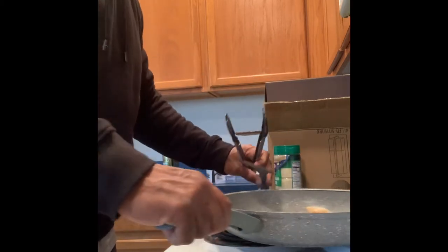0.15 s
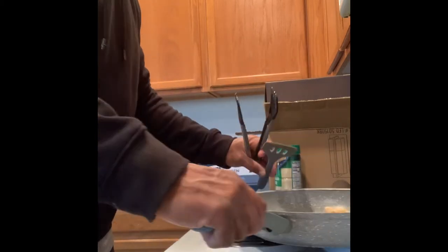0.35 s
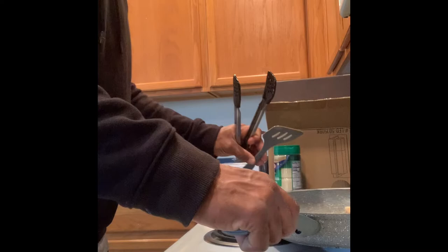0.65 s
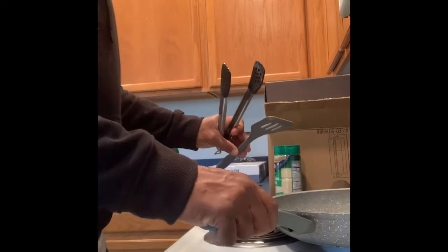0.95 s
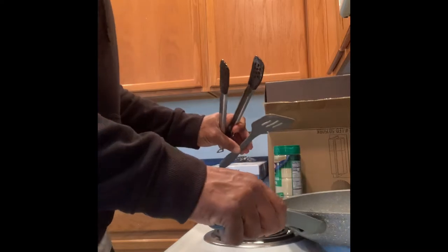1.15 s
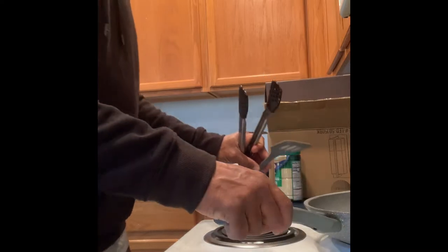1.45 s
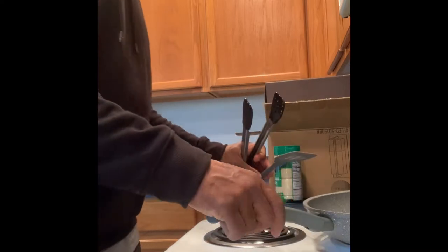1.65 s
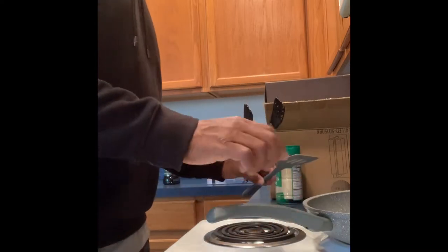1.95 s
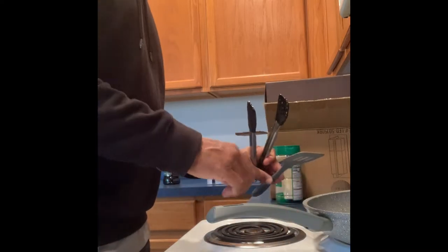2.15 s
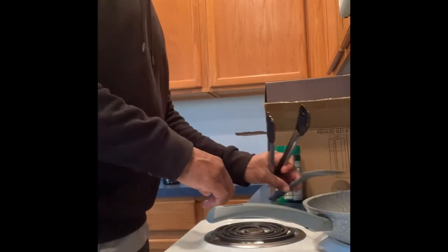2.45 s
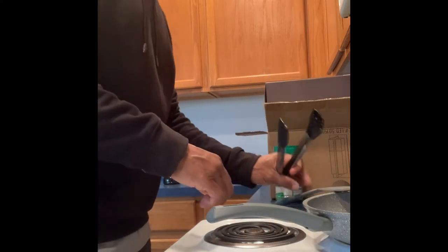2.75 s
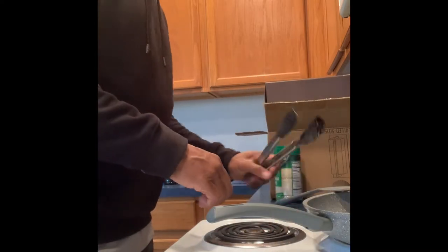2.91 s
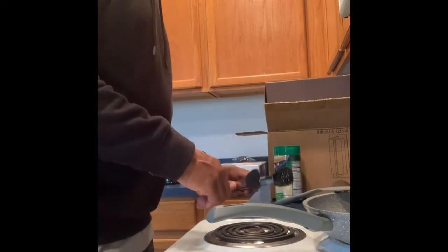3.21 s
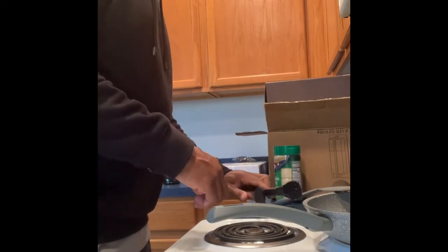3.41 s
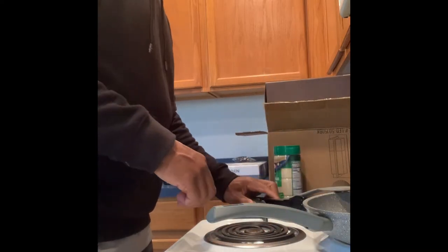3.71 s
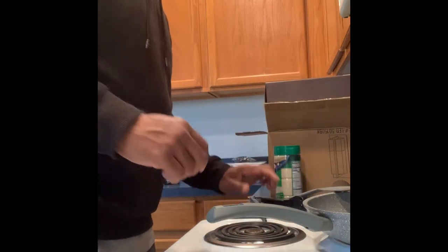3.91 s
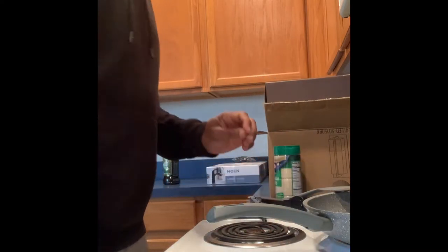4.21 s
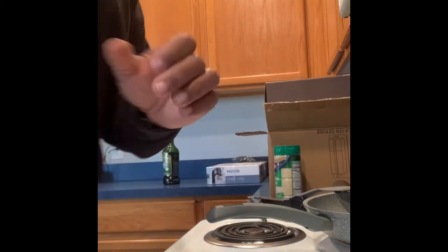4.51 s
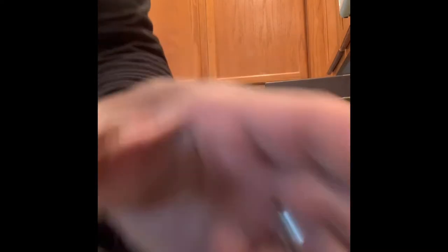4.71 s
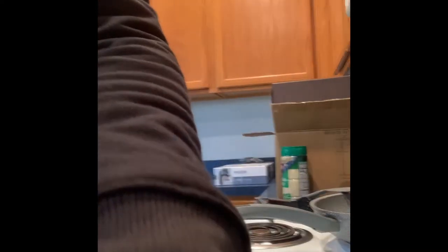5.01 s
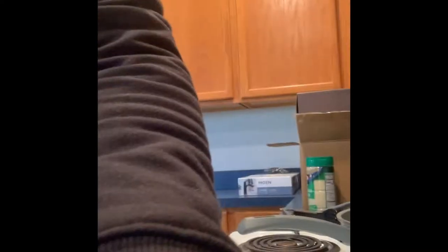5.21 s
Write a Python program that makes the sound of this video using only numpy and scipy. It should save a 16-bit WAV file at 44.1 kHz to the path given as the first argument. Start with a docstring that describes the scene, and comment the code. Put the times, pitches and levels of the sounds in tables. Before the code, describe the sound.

A frying pan scrapes and rings across an electric stove, a heavy knock follows, utensils clatter down amid small ticks, then loud handling thumps.

```python
"""A frying pan scrapes and rings as it is dragged off the coil of an electric stove and let go.
The bared coil ticks as it cools, a spatula and tongs are laid down, sleeves rustle;
then a hand grabs the phone that stands on the counter, where all this is heard.
Contacts and clicks ring damped modes, shaped noise makes grinding, snaps, rustle and room tone.
Airborne sound reaches the left microphone port a little after the right one."""
import sys
import numpy as np
from scipy import signal
from scipy.fft import rfft, irfft
from scipy.io import wavfile

SR = 44100
rng = np.random.default_rng(int(sys.argv[2]) if len(sys.argv) > 2 else 0)


def generate_wav(signal):
    """Clip the signal to [-1, 1] and save it as 16-bit WAV at the path in sys.argv[1]."""
    frames = np.transpose(np.atleast_2d(signal))
    scaled = np.clip(frames, -1, 1) * 32767
    pcm = np.round(scaled).astype(np.int16)
    wavfile.write(sys.argv[1], SR, pcm)


N = 236464

# ringing modes of the pan, when struck: pitch_hz, level_db, t60_s
PAN_MODES = [(227.6, -19.5, 0.18), (414.6, -7.5, 0.2), (439, 3, 0.12), (628, -12, 0.25),
             (705.5, -10.5, 0.17), (754, -2.5, 0.13), (817, -2, 0.13), (1071, -11.5, 0.14),
             (1186, -25, 0.089), (1550, -13.5, 0.049), (1730, -15, 0.046), (1860, -11, 0.065),
             (2020, -6.5, 0.03), (2215, -14, 0.044)]
# bright hiss shared by scraping grit, case snaps and rustle: pitch_hz, relative level_db per Hz
HISS_SPECTRUM = [(2000, -12), (4000, -4.5), (6000, 0.5), (7800, -5), (9300, -4), (11000, -12),
                 (13000, -36.5), (15000, -7), (16500, -10)]


def slide():
    """Stick-slip contacts ring the pan's modes, each waxing as the contact moves, amid grind and hiss."""
    # tone of the stove top under the contacts: pitch_hz, relative level_db per Hz
    stove_top_spectrum = [(70, -28), (120, 9), (180, -18.5), (300, -2), (380, -7)]
    # coarse scraping: pitch_hz, relative level_db per Hz
    grind_spectrum = [(90, -22), (150, -10), (300, -5), (600, 2.5), (1200, 5.5), (2000, 8.5), (2600, -2),
                      (4000, 7.5), (5500, -30), (9000, -50)]
    pan_rest_db = -58.5  # the stove's tremor keeps the pan murmuring
    ring_gain, grind_gain, grit_gain = contact_levels()

    contacts = grains(1500, uneven_db=3.5) * from_db(2.6 * drift(20.5))
    pan = np.zeros(N)
    for k, (hz, db, t60) in enumerate(PAN_MODES):
        waxing = from_db(2.5 * drift(9))
        # touching the stove, the pan rings shorter than when struck
        pan += (-1) ** k * from_db(db) * ring(contacts * waxing, hz, 0.34 * t60)
    body = rms_one(pan) + from_db(-17.0) * colour(contacts, stove_top_spectrum)

    grind = colour(grains(4000, uneven_db=3.0), grind_spectrum) * from_db(3.1 * drift(39))
    grit = colour(grains(8600, uneven_db=3.5), HISS_SPECTRUM) * from_db(1.9 * drift(17))
    body_gain = np.hypot(ring_gain, from_db(pan_rest_db))
    return body_gain * body + grind_gain * grind + grit_gain * grit


def contact_levels():
    """Gains of ring, grind and grit: the drag, plus scuffs that rise fast and die away."""
    # the pan dragged off the coil: time_s, ring_db, harshness_db
    drag_curve = [(0.0, -31, 4.5), (0.12, -25.5, -0.5), (0.23, -33.5, -2), (0.42, -37.5, -4),
                  (0.73, -38, -0.5), (0.8, -39, 4), (0.93, -37, -4), (0.99, -48.5, -6), (1.055, -40, -3),
                  (1.09, -34, 2), (1.26, -37.5, 4), (1.34, -42, 2), (1.52, -40, -7), (1.6, -47, -3),
                  (1.72, -52.5, -6), (1.82, -89, -21)]
    # short scuffs of pan and utensils: start_s, ring_db, harshness_db, t60_s
    scuff_table = [(1.075, -26, 9, 0.04), (1.2, -25.5, 7.5, 0.15), (2.662, -43.5, 4.5, 0.52),
                   (2.715, -33, -14, 0.3), (3.649, -42, -9.5, 0.46), (3.695, -42.5, -17, 0.3),
                   (3.818, -42.5, 1.5, .4), (3.89, -46.5, -8, 0.26)]
    scuff_rise_s = 0.011  # time to climb the last 20 dB
    grind_db, grit_db = -7.5, -7  # against the ring, before harshness

    drag_db, drag_harsh_db = in_time(drag_curve, outside=-120)
    start_s, level_db, scuff_harsh_db, t60 = np.transpose(scuff_table)[:, :, None]
    since = np.arange(N) / SR - start_s
    loss_db = np.where(since < 0, -20 * since / scuff_rise_s, 60 * since / t60)
    scuff_db = level_db - np.minimum(loss_db, 120)

    ring_db = np.vstack([drag_db, scuff_db])
    harsh_db = np.vstack([drag_harsh_db, scuff_harsh_db + 0 * since])
    layers = [ring_db, ring_db + grind_db + harsh_db, ring_db + grit_db + harsh_db]
    # drag and scuffs add in power
    return [np.sqrt(np.sum(from_db(2 * db), axis=0)) for db in layers]


def knocks():
    """Blows on pan and stove top set the pan's modes ringing."""
    # start_s, level_db, low_modes_db, brightness_db per octave
    knock_table = [(0.161, -33, -8, -3.0), (0.28, -24, 6, 1), (1.073, -43, -18, 5), (1.204, -32, 13, 1.5),
                   (1.48, -23, -10, -21), (1.51, -31, 10, -8), (2.652, -27, -1.5, -19),
                   (2.6782, -9.5, 0, -8), (2.711, -39, -13, -32), (3.994, -54, 23.5, -6.0)]
    return strike(knock_table, PAN_MODES, spread_db=1.0)


def bumps():
    """Utensils bump on the counter and ring its damped modes."""
    # start_s, level_db, low_modes_db, brightness_db per octave
    bump_table = [(2.2205, -38.5, 1, 2), (2.238, -40, 12, -4), (3.624, -33, -5, -2), (3.639, -37, -2, 3),
                  (3.691, -30, -7, -1), (3.703, -36, -6, -5), (3.716, -32, 2, -11), (3.771, -37.5, 1, -5),
                  (3.794, -29, -4.5, -2), (3.809, -28, -14, -2), (3.844, -43, -5, 3), (3.884, -38, 0, 9),
                  (4.26, -46, -2.5, -2)]
    # ringing modes of the counter: pitch_hz, level_db, t60_s
    counter_modes = [(136, 4, 0.17), (251, 3, 0.079), (420, 10, 0.022), (646, -2, 0.11), (827, -7.5, 0.25),
                     (1010, -6, 0.049), (1370, -14.5, 0.054), (2000, -11, 0.035), (2600, -14, 0.022)]
    return strike(bump_table, counter_modes, spread_db=3.0)


def strike(blows, modes, spread_db):
    """Each blow strikes every mode, neighbours in opposite sense; place and hardness weight lows and highs."""
    start_s, level_db, low_db, bright_db = np.transpose(blows)
    chance = rng.normal(0, spread_db, (len(start_s), len(modes)))
    out = np.zeros(N)
    for k, (hz, db, t60) in enumerate(modes):
        # lows below 550 Hz, brightness rising from 900 Hz
        weight_db = low_db * (hz < 550) + bright_db * max(np.log2(hz / 900), 0)
        gains = from_db(level_db + db - 8.0 + weight_db + chance[:, k])
        out -= (-1) ** k * ring(clicks(start_s, gains), hz, t60)
    return out


def ticks():
    """Bright snaps smeared by thin metal and near walls into short dying noise; some ping."""
    # ticks of the cooling coil and of utensil tips: start_s, level_db
    tick_table = [(1.064, -21.5), (1.11, -25.5), (1.205, -19.5), (1.3076, -32), (1.502, -37), (1.7262, -41),
                  (1.811, -50), (1.877, -43.5), (1.929, -46), (1.971, -40), (2.0535, -39.5), (2.117, -44),
                  (2.2032, -37.5), (2.2904, -51), (2.3493, -40), (2.3887, -46), (2.43, -44.5),
                  (2.5039, -43.5), (2.5608, -37), (2.628, -44), (2.6586, -41), (2.811, -34.5),
                  (3.0072, -30), (3.177, -37.5), (3.3024, -37.5), (3.42, -39.5), (3.536, -40.5),
                  (3.545, -34.5), (3.6186, -37.5), (3.792, -37), (3.8778, -48), (4.1167, -41),
                  (4.3687, -40), (4.5223, -46), (4.5837, -42.5), (4.834, -43)]
    # pitch_hz, relative level_db per Hz
    tick_spectrum = [(1500, -20), (3500, -22.5), (6000, -4.5), (8000, -11), (9400, -0.5), (11500, -18.5),
                     (13000, -25), (15000, -7), (16500, -7)]
    # faint pings of the coil: start_s, level_db
    ping_table = [(1.815, -59), (1.879, -58), (1.929, -53), (2.001, -53), (2.065, -63.5), (2.203, -53.5),
                  (2.562, -51.5)]
    tick_t60_s, ping_hz, ping_t60_s = 0.11, 1630, 0.12

    start_s, level_db = np.transpose(tick_table)
    envelope = dying(clicks(start_s, from_db(level_db - 7)), tick_t60_s)
    snaps = colour(rng.standard_normal(N), tick_spectrum) * envelope

    start_s, level_db = np.transpose(ping_table)
    # noise through a narrow resonance: a shivering tone
    shiver = rms_one(ring(rng.standard_normal(N), ping_hz, 0.048))
    return snaps + shiver * dying(clicks(start_s, from_db(level_db)), ping_t60_s)


def grab():
    """The case cracks under rubbing fingers as the phone is shoved; (through body, through air, at each port)."""
    # cracks of the case: start_s, body_db, snap_db
    crack_table = [(5.025, -21, -42), (5.049, 4, -51), (5.054, -8.5, -21.5), (5.078, -25, -37),
                   (5.093, -24, -39), (5.106, -28, -61), (5.152, -46, -45), (5.161, -13, -58),
                   (5.178, -46, -40), (5.187, -17, -42), (5.194, -12.5, -46), (5.236, -29, -65),
                   (5.253, -20, -65), (5.272, -31, -47), (5.338, -55, -49), (5.354, -51, -49)]
    # ringing modes of the phone case: pitch_hz, level_db, t60_s
    case_modes = [(314, -30, 0.022), (634, 2.5, 0.024), (1290, 7.5, 0.011), (2047, -9, 0.044)]
    # low shoves of the hand: start_s, level_db, pitch_hz, t60_s
    shove_table = [(5.055, 0, 108, 0.053), (5.074, -19.5, 68.2, 0.43), (5.117, -7, 106, 0.24),
                   (5.148, -2.5, 66, 0.082), (5.176, -3.5, 59, 0.093), (5.189, 5.5, 220, 0.015),
                   (5.195, -2, 87.6, 0.059), (5.26, -20.5, 53.5, 0.17), (5.285, -23, 53.5, 0.25),
                   (5.338, -24.5, 405, 0.034), (5.353, -24, 420, 0.062)]
    # fingers rubbing the case: time_s, level_db
    rub_curve = [(5.018, -45), (5.028, -27.5), (5.1, -20), (5.135, -32.5), (5.16, -22.5), (5.2, -29),
                 (5.23, -41), (5.27, -36.5), (5.32, -51), (5.36, -42)]
    # skin on the case: pitch_hz, relative level_db per Hz
    skin_spectrum = [(120, -1), (250, 3), (600, -7.5), (1300, -8.5), (2200, -25.5), (3000, -30),
                     (5000, -47)]

    start_s, body_db, snap_db = np.transpose(crack_table)
    cracks = sum(ring(clicks(start_s, from_db(body_db + db - 9.5)), hz, t60) for hz, db, t60 in case_modes)
    envelope = dying(clicks(start_s, from_db(snap_db + 4.5)), 0.017)
    snaps = colour(rng.standard_normal(N), HISS_SPECTRUM) * envelope

    (rub_db,) = in_time(rub_curve, outside=-120)
    pressure = from_db(rub_db + 4.34 * drift(37))
    # each port hears its own rubbing noise under the same pressure
    rub = np.array([colour(grains(4000, uneven_db=3.5), skin_spectrum) * pressure for port in range(2)])
    return cracks + thumps(shove_table), snaps, rub


def booms():
    """Stove and counter boom in low damped modes, felt through the phone's stand."""
    # start_s, level_db, pitch_hz, t60_s
    boom_table = [(0.009, -28.5, 62.5, 0.1), (0.215, -20.5, 56, 0.2), (1.285, -30, 62, 0.078),
                  (1.331, -26, 65.3, 0.11), (1.367, -29, 60, 0.18), (1.474, -27.5, 62, 0.22),
                  (1.517, -32, 54, 0.27), (3.629, -33.5, 105, 0.16), (3.688, -35, 114, 0.26),
                  (4.374, -35.5, 59.2, 0.21), (4.429, -34, 47.5, 0.11)]
    return thumps(boom_table)


def thumps(rows):
    """Each low push rings one damped mode, its start rounded."""
    out = sum(ring(clicks([s], -from_db(db + 3.0)), hz, t60) for s, db, hz, t60 in rows)
    return signal.sosfilt(signal.butter(2, 400, fs=SR, output="sos"), out)


def pops():
    """Bending waves arrive highs first, so a distant tap slides down in pitch; several paths blur it."""
    # dull pops: start_s, level_db
    pop_table = [(1.333, -42), (1.469, -53), (1.503, -45), (2.2196, -39), (3.7, -53), (4.26, -53.5)]
    # the pitch starts at end + drop and falls towards end
    drop_hz, end_hz, fall_s, t60_s = 1554, 109.4, 0.01203, 0.15

    t = np.arange(SR // 5) / SR
    hz = end_hz + drop_hz / (1 + t / fall_s) ** 3.62
    pop = np.sin(2 * np.pi * np.cumsum(hz) / SR) * from_db(-60 * t / t60_s)

    start_s, level_db = np.transpose(pop_table)
    # five later paths per tap, inverted and 2 dB weaker
    path_s = rng.random((len(start_s), 5)) ** 1.5 * 0.01205
    direct = clicks(start_s, from_db(level_db))
    late = clicks((start_s[:, None] + path_s).ravel(), -np.repeat(from_db(level_db - 2.0), 5))
    return signal.fftconvolve(direct + late, pop)[:N]


def background():
    """Room tone, hum of an appliance, rumble of the stove and a bright rustle: shaped noise and one sine."""
    # pitch_hz, relative level_db per Hz
    room_tone_spectrum = [(100, -8.5), (200, 4), (330, -2.5), (450, -3.5), (650, -13), (820, -12.5),
                          (1200, -13.5), (2500, -35), (4500, -21), (6000, -96)]
    # pitch_hz, relative level_db per Hz
    rumble_spectrum = [(25, -23), (40, -4.5), (60, 0.5), (100, -10.5), (160, -9.5), (260, -66)]
    # time_s, level_db
    rumble_curve = [(0.0, -39), (0.4, -51.5), (1.2, -46), (1.34, -41), (1.5, -54), (2.6, -57), (3.42, -67),
                    (3.82, -44), (4.08, -57), (4.3, -55), (5.05, -54.5), (5.19, -38), (5.36, -43)]
    # time_s, level_db
    rustle_curve = [(0.0, -69), (0.33, -43), (0.5, -68), (1.2, -45.5), (1.46, -59), (2.6, -60.5),
                    (3.4, -60), (4.08, -55.5), (4.3, -52), (5.36, -51.5)]
    room_tone_db, hum_hz, hum_db = -53, 116.4, -58

    (rumble_db,), (rustle_db,) = in_time(rumble_curve), in_time(rustle_curve)
    tone = from_db(room_tone_db + 0.4 * drift(4.6)) * colour(rng.standard_normal(N), room_tone_spectrum)
    hum_wave = np.sqrt(2) * np.sin(2 * np.pi * hum_hz * np.arange(N) / SR)  # rms 1
    hum = from_db(hum_db + 0.5 * drift(2.3)) * hum_wave
    rumble = from_db(rumble_db + 3.6 * drift(5.0)) * colour(rng.standard_normal(N), rumble_spectrum)
    rustle = from_db(rustle_db + 2.23 * drift(5.2)) * colour(rng.standard_normal(N), HISS_SPECTRUM)
    return tone + hum + rumble + rustle


def at_ports(x, lag_s):
    """The left port hears x later by lag_s, which may change with frequency; (left, right)."""
    # left port over right: pitch_hz, level_db
    left_balance = [(100, -0.5), (250, -1), (500, -0.5), (1000, 2), (2500, -2), (5000, -1.5)]
    hz = np.arange(N // 2 + 1) * SR / N
    delay = np.exp(-2j * np.pi * hz * lag_s)
    left = irfft(rfft(x) * delay * from_db(across(left_balance, 0)), N)
    return np.array([left, x])


def near_echoes(x):
    """Counter, box and wall beside the phone smear the mid range, differently per port."""
    # near echoes against the direct sound: pitch_hz, level_db
    scatter_curve = [(300, -9.5), (800, -3.5), (1800, -2.5), (2800, 0.5), (4200, -6.5)]
    scatter_t60_s = 0.045  # of the noise that gives the phases
    fall = from_db(-60 * np.arange(N) / SR / scatter_t60_s)
    responses = rfft(rng.standard_normal((2, N)) * fall)
    phases = responses / np.abs(responses)  # the level comes from scatter_curve alone
    return irfft(rfft(x) * phases * from_db(across(scatter_curve, -63)), N)


def kitchen(x):
    """Six feedback delays a side, duller on every round, stepped block by block."""
    t60_s, wall_cut_hz = 0.36, 1850  # decay in the bass; the walls' dulling shortens the treble
    out = np.zeros((2, N))
    dull = np.exp(-2 * np.pi * wall_cut_hz / SR)
    lags = (rng.uniform(.010, .030, 12) * SR).astype(int)
    for k, lag in enumerate(lags):
        loop, state = x.copy(), [0.]
        gain = from_db(-60 * lag / SR / t60_s)
        for i in range(lag, N, lag):
            back, state = signal.lfilter([gain * (1 - dull)], [1, -dull], loop[i - lag:i], zi=state)
            loop[i:i + lag] += back[:N - i]
        out[k % 2] += (loop - x) * (-1) ** (k // 2)
    return out


def from_db(db):
    """Decibels to gain."""
    return 10 ** (np.asarray(db) / 20)


def rms_one(x):
    """Scaled to rms 1."""
    return x / np.sqrt(np.mean(x ** 2) + 1e-20)


def in_time(rows, outside=None):
    """Curve columns at every sample."""
    s, *columns = np.transpose(rows)
    return [np.interp(np.arange(N) / SR, s, c, outside, outside) for c in columns]


def across(points, outside):
    """A (pitch_hz, level_db) table on the FFT grid, drawn over log frequency."""
    hz, db = np.transpose(points)
    grid_hz = np.arange(1, N // 2 + 2) * SR / N
    return np.interp(np.log(grid_hz), np.log(hz), db, outside, outside)


def colour(x, spectrum):
    """Shapes the spectrum of a steady signal; rms 1."""
    return rms_one(irfft(rfft(x) * from_db(across(spectrum, -90)), N))


def drift(rate_hz):
    """Slow chance of spread 1: low-passed noise made at every 40th sample."""
    r = np.exp(-80 * np.pi * rate_hz / SR)
    noise = rng.standard_normal(N // 40 + 2002)
    slow = signal.lfilter([1], [1, -2 * r, r * r], noise)[2000:]  # skip the settling
    return np.interp(np.arange(N) / 40, np.arange(len(slow)), rms_one(slow))


def grains(per_s, uneven_db):
    """Random contacts of uneven size; rms 1."""
    sizes = from_db(uneven_db * np.minimum(rng.exponential(1, N), 4)) * rng.choice([-1, 1], N)
    return rms_one(sizes * (rng.random(N) < per_s / SR))


def clicks(times, gains):
    """Single samples of the given gains at given times."""
    out = np.zeros(N)
    np.add.at(out, np.round(np.asarray(times) * SR).astype(int), gains)
    return out


def ring(x, hz, t60):
    """A unit click sets a dying sine of height 1 ringing."""
    r, w = from_db(-60 / (t60 * SR)), 2 * np.pi * hz / SR
    return signal.lfilter([0, np.sin(w)], [1, -2 * r * np.cos(w), r * r], x + 1e-18)


def dying(x, t60):
    """Each click becomes a falling envelope."""
    return signal.lfilter([1], [1, -from_db(-60 / (t60 * SR))], x + 1e-18)


def scene():
    """Airborne sources fill the kitchen; booms, pops and the grab travel as bending waves, slower in the bass."""
    left_lag_s = 0.00011  # through the air
    body_lag_s, pop_lag_s = 0.00081, 0.0029  # at 100 Hz; pops cross the phone lengthwise
    kitchen_low_hz = 243  # below this the kitchen adds little reverberation

    held, snaps, rub = grab()
    air = slide() + knocks() + bumps() + ticks() + background()

    slowness = np.sqrt(100 / np.linspace(1, SR / 2, N // 2 + 1))  # 1 at 100 Hz
    body = at_ports(booms() + held, body_lag_s * slowness) + at_ports(pops(), pop_lag_s * slowness)

    no_bass = signal.butter(2, kitchen_low_hz, "high", fs=SR, output="sos")
    walls = kitchen(signal.sosfilt(no_bass, air))
    return at_ports(air + snaps, left_lag_s) + body + rub + from_db(-14) * walls + near_echoes(air)


def record(dry):
    """Peaks are rounded, deep bass and the top are cut."""
    cutoff_hz = 16400
    rounded = 1.062 * np.tanh(dry / 1.253)
    no_deep_bass = signal.sosfilt(signal.butter(3, 40, "high", fs=SR, output="sos"), rounded)
    return signal.sosfilt(signal.cheby2(12, 70, cutoff_hz, fs=SR, output="sos"), no_deep_bass)


dry = scene()
out = record(dry)
generate_wav(out)
```